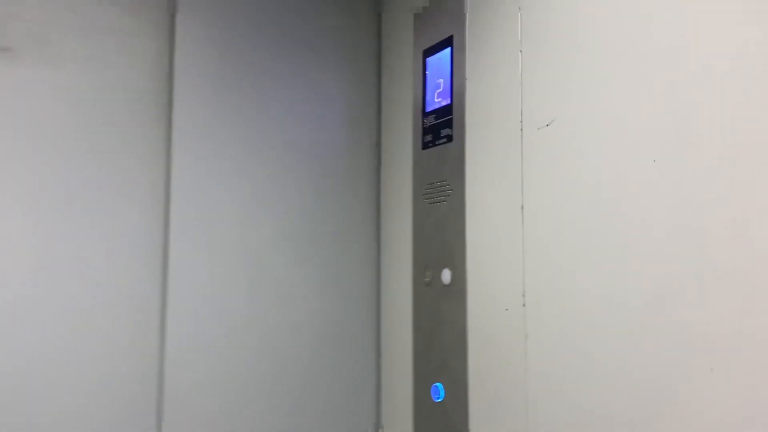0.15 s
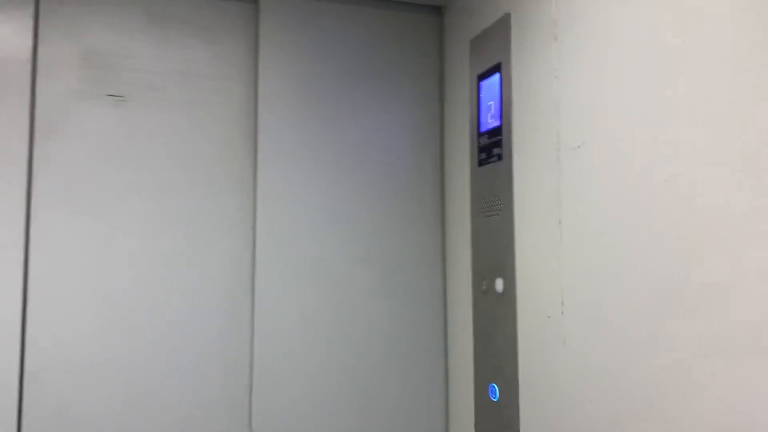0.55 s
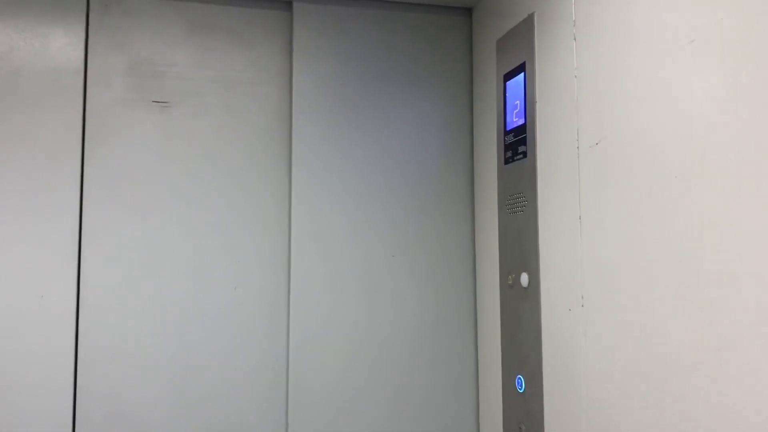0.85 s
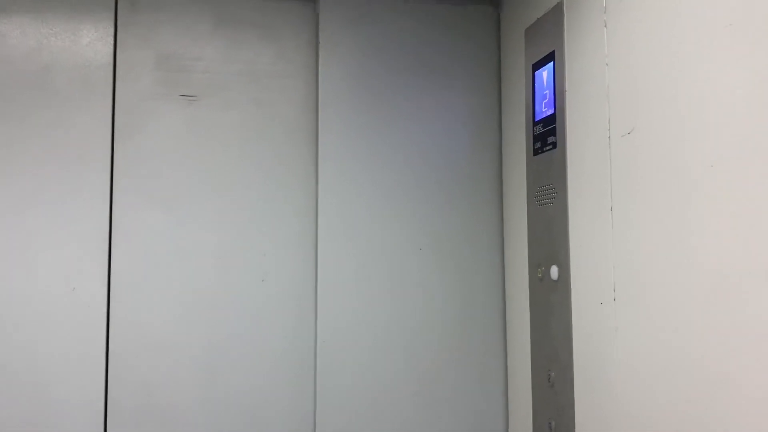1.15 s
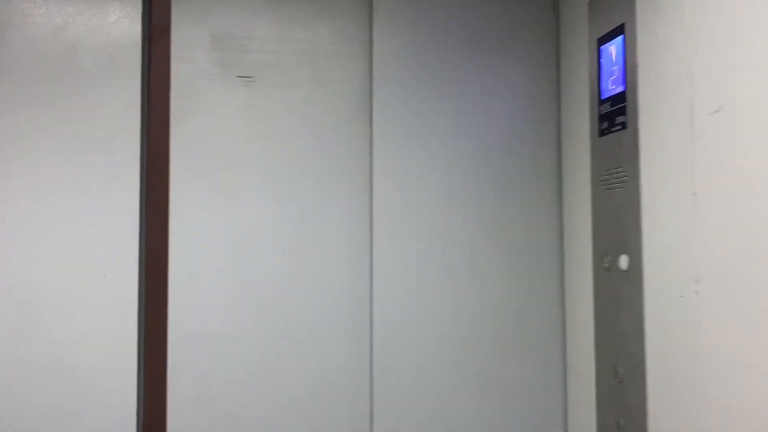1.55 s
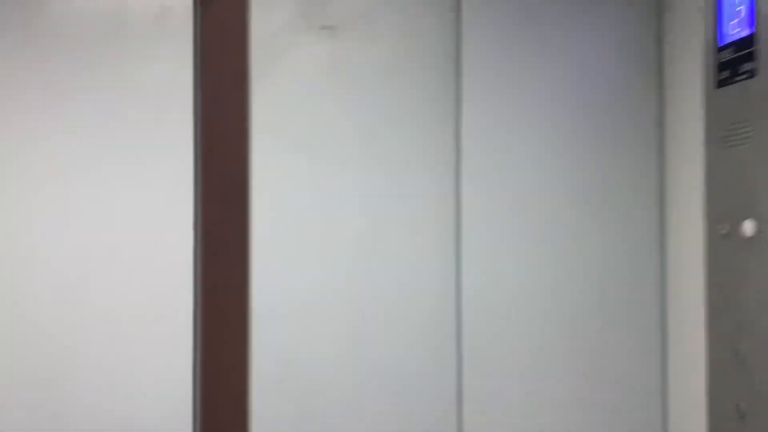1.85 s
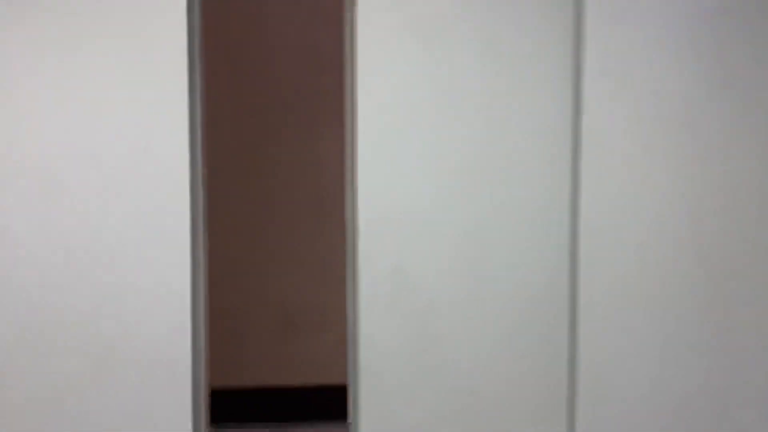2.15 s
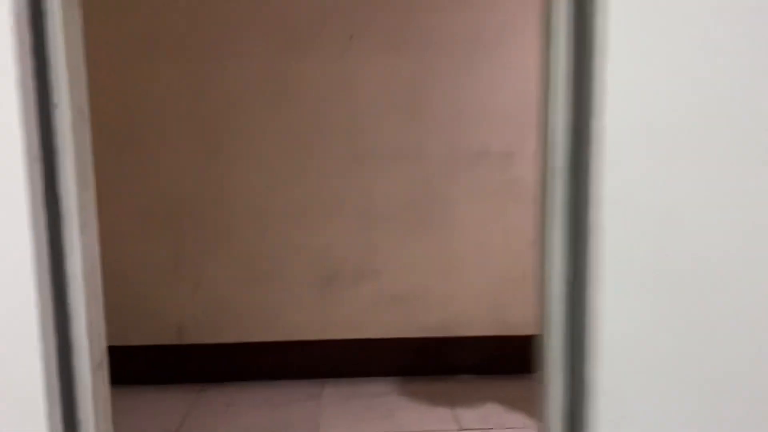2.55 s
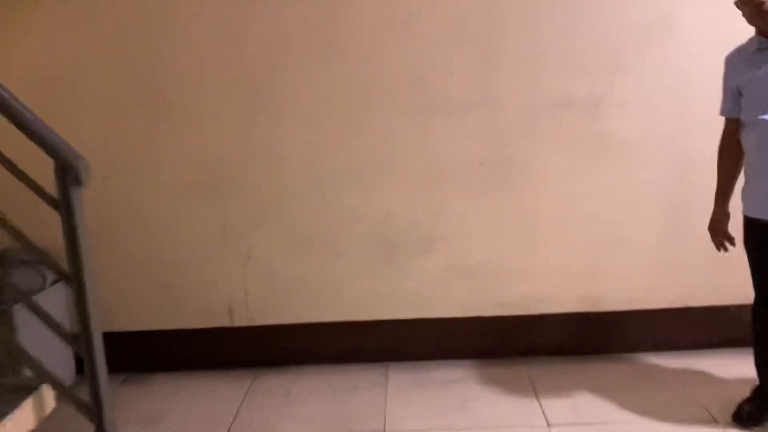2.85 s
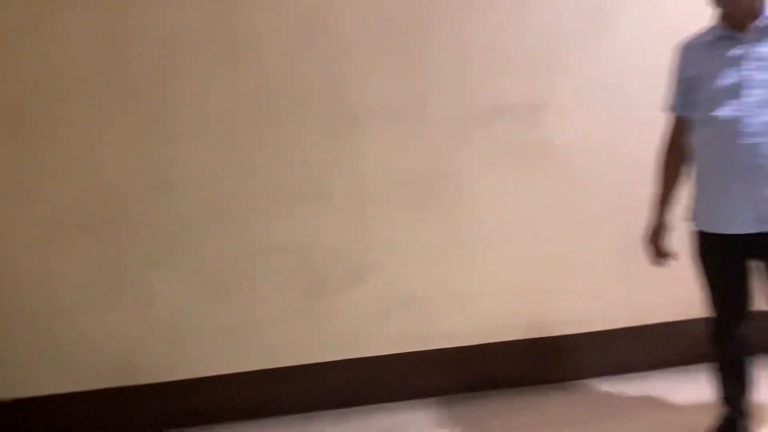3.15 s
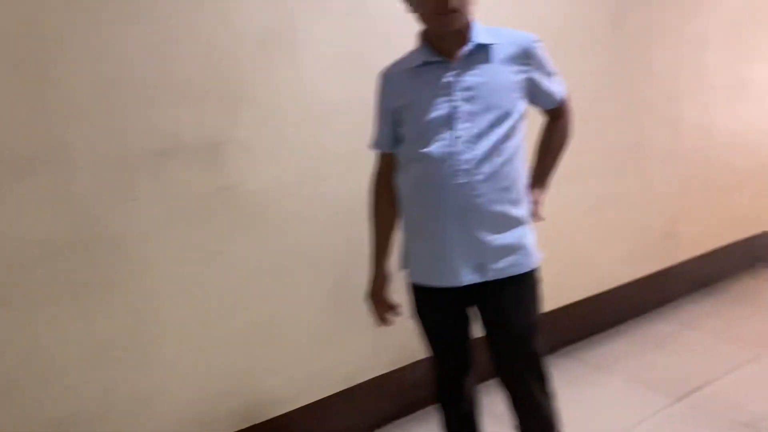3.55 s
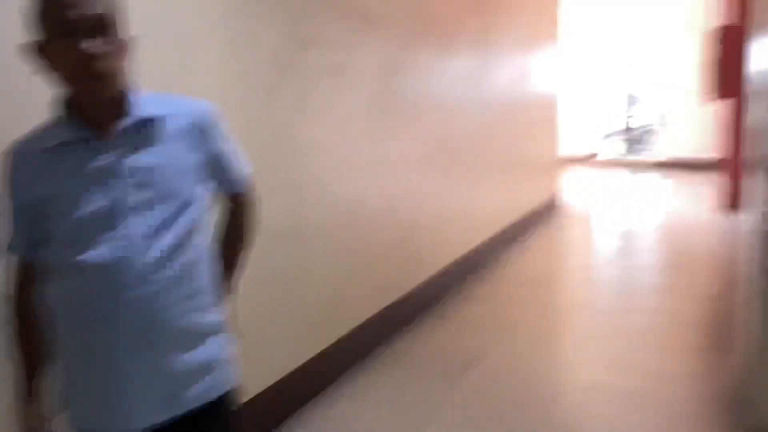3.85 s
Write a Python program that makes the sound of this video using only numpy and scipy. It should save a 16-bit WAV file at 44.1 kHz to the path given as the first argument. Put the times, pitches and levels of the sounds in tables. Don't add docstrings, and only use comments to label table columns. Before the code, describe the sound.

Elevator doors rumble and clunk open after a metallic hiss and short squeak, fan running steadily

```python
import sys
import numpy as np
from scipy import signal
from scipy.fft import rfft, irfft
from scipy.io import wavfile
from scipy.ndimage import uniform_filter1d

SR = 44100
rng = np.random.default_rng(int(sys.argv[2]) if len(sys.argv) > 2 else 0)


def volts_from_db(level):
    exponent = np.asarray(level, float) / 20
    return 10 ** exponent


def log_audio(samples):
    frames = np.atleast_2d(samples).T
    limited = np.clip(frames, -1, 1)
    pcm = np.round(limited * 32767).astype(np.int16)
    wavfile.write(sys.argv[1], SR, pcm)


N = 176400
T = np.arange(N) / SR


def evened(x):
    return x / np.sqrt(np.mean(x ** 2) + 1e-20)


def read(points, hz):
    f, value = np.transpose(points)
    return np.interp(np.log(hz + 1), np.log(f + 1), value)


def slow(rate):
    f = np.geomspace(rate / 20, rate, 16)[:, None]
    t = T[::128]
    waves = np.sin(2 * np.pi * (f * t + rng.random((16, 1)))) / np.sqrt(f)
    return np.interp(T, t, evened(waves.sum(0)))


def noise(spectrum, patchy_db):
    frames, hz = N // 512 + 5, np.fft.rfftfreq(2048, 1 / SR)
    a, b = rng.standard_normal((2, 2, 1025, frames))
    patches = uniform_filter1d(rng.standard_normal((1025, frames)), size=16, axis=0)
    patches = evened(uniform_filter1d(patches, size=7, axis=1))
    z = (a + 1j * b) * volts_from_db(patchy_db * patches + read(spectrum, hz)[:, None])
    return evened(signal.istft(z, nperseg=2048, noverlap=1536)[1][:, :N])


def resonate(x, hz, width):
    turn = np.exp(2j * np.pi * np.cumsum(hz * np.ones(x.shape[1])) / SR)
    r, q = np.exp(-np.pi * np.array([1, 3]) * width / SR)
    smooth = signal.lfilter([1], np.convolve([1, -r], [1, -q]), x / turn)
    return evened((turn * smooth).real)


def rung(drive, modes, pitch):
    return evened(sum(volts_from_db(db) * resonate(drive, hz * pitch, width) for hz, width, db in modes))


def envelope(start, rise, hold, fall_db):
    t = T - start
    return np.clip(t / rise, 0, 1) ** 2 * volts_from_db(fall_db * np.maximum(t - rise - hold, 0))


def placed(sound, start):
    out, at = np.zeros((2, N)), round(start * SR)
    out[:, at:at + sound.shape[1]] = sound[:, :N - at]
    return out


def doors():
    # time in seconds, then levels of rolling, grit and low bass in dB.
    rolling = [(0, -66, -77, -35.5), (1.15, -45, -60, -35), (1.36, -37, -44, -32), (1.6, -42, -43, -33),
               (1.92, -38.5, -41, -31.5), (2.029, -23.5, -38, -29), (2.36, -21, -33, -33.5),
               (2.66, -22, -35, -36.5), (2.82, -19.5, -26, -37), (3.0, -20.5, -26, -29.5),
               (3.2, -20.5, -25, -30.5), (3.34, -21.5, -28, -30), (3.6, -22, -33.5, -34.5),
               (3.82, -28.5, -35, -31), (3.92, -30, -30, -31), (4, -28, -38, -28)]
    # frequency in Hz, level in dB per Hz.
    rumble_colour = [(140, -38), (200, -14), (290, -6.5), (380, -3), (480, -1.5), (680, -3), (900, -10),
                     (1500, -29), (5000, -80)]
    grit_colour = [(600, -38), (950, 1.5), (1300, -3), (1700, -12.5), (3000, -19.5), (4500, -26),
                   (7000, -40.5), (14000, -50)]
    bass_colour = [(15, -31), (30, -14), (58, 1.5), (90, -0.5), (120, -11), (148, -2.5), (180, -12.5),
                   (600, -85)]
    # pitch in Hz, width in Hz, level in dB.
    panels = [(382, 6.4, 5), (425, 13, 0), (464.7, 44, 3), (491, 30, -9.5), (538, 5.9, -6), (609.3, 7.2, 3),
              (683, 19, 1), (735, 9.2, -4), (850, 5.3, 1), (1028, 33, -7), (1262, 13, -7.5)]
    panel_db, lump_db = -5, -0.32

    s, *columns = np.transpose(rolling)
    level, grit, bass = (volts_from_db(np.interp(T, s, db)) for db in columns)
    drive = rng.standard_normal((2, N - SR))
    modes = placed(rung(drive, panels, 1 + 0.012 * slow(6)[SR:]), 1)
    body = (noise(rumble_colour, 0.4) + volts_from_db(panel_db) * modes) * volts_from_db(lump_db * slow(60))
    return level * body + grit * noise(grit_colour, 1.8) + bass * noise(bass_colour, 1.23)


def bumps():
    # start in seconds, peak level in dB, pitch in Hz.
    joints = [(1.983, -10.5, 429), (2.063, -13, 395), (2.189, -9, 449), (2.328, -19, 450), (2.44, -11, 554),
              (2.477, -6.5, 456), (2.532, -8, 461), (2.577, -6, 425), (2.643, -13, 407), (2.722, -16, 471),
              (2.767, -6, 489), (2.805, -13, 563), (2.842, -5, 590), (2.889, -11, 660), (2.974, -12, 424),
              (3.172, -11, 690), (3.384, -12, 575), (3.445, -10.5, 421), (3.565, -11.5, 458),
              (3.622, -18, 433), (3.714, -14, 407)]
    trim_db, rise_s, t60_s = -3, 0.0043, 0.09
    t, out = T[:SR // 5], np.zeros((2, N))
    for (start, db, hz), turns in zip(joints, rng.random((len(joints), 2, 1))):
        shape = np.minimum(t / rise_s, 1) * volts_from_db(db + trim_db - 60 * t / t60_s)
        out += placed(shape * np.sin(2 * np.pi * (hz * t + turns)), start)
    return out


def drones():
    # start in seconds, length in seconds, pitch in Hz, level in dB.
    tones = [(0.271, 0.29, 376, -36.5), (1.3, 0.11, 92.2, -30.5), (2.42, 0.12, 507.4, -23.5),
             (1.448, 0.49, 35.7, -29.5), (1.704, 0.34, 59, -34.5), (1.988, 0.27, 36.6, -32.5),
             (1.997, 0.37, 388, -29), (2.27, 0.18, 458, -19.5), (2.31, 0.1, 661, -24.5),
             (2.497, 0.18, 428.6, -24), (2.528, 0.38, 82.5, -26.5), (2.698, 0.16, 57.6, -31),
             (2.968, 0.19, 382, -22.5), (2.97, 0.096, 672, -24), (3.119, 0.14, 1262, -26),
             (3.15, .2, 138.4, -36), (3.2, 0.24, 423.6, -25), (1.369, 0.25, 386, -36),
             (3.343, 0.38, 75.3, -33.5), (3.873, 0.12, 71.7, -33.5), (.262, .05, 2555, -21.5),
             (0.326, 0.038, 3010, -26), (0.338, .06, 2580, -30), (1.496, 0.33, 331.4, -41),
             (3.902, 0.066, 271.8, -35), (2.112, 0.1, 641, -21.5), (2.819, 0.14, 621, -25.5),
             (3.15, 0.14, 686, -24.5), (3.104, 0.22, 1000, -31), (2.596, 0.22, 700, -28),
             (3.363, .07, 687, -29)]
    wobble_hz = 4.5
    out = np.zeros((2, N))
    for start, length, hz, db in tones:
        t = np.arange(0, length, 1 / SR)
        swell = np.sin(np.pi * t / length) ** 0.27
        wobble = wobble_hz * slow(17.35)[:len(t)] * np.sqrt(hz / 400)
        turns = np.cumsum(hz + wobble) / SR
        level = volts_from_db(db + 2 + 2.76 * slow(39.0)[:len(t)])
        out += placed(level * swell * np.sin(2 * np.pi * (turns + rng.random((2, 1)))), start)
    return out


def brake():
    # pitch in Hz, width in Hz, level in dB.
    steel = [(1680, 220, -11), (2170, 100, -8), (2585, 80, -4), (2777, 190, 1), (3000, 115, 0),
             (3150, 120, -9.5), (3390, 88, -8.5), (3650, 84, -10.5), (4000, 780, -8.5)]
    # frequency in Hz, level in dB per Hz.
    air_colour = [(200, -12.5), (380, 1), (750, -6.5), (1200, -1), (1900, -9.5), (2800, -13), (5500, -18),
                  (8000, -33.5), (13000, -43)]
    start_s, upswell_s = 0.25, 0.049

    drive = rng.standard_normal((2, SR)) * volts_from_db(0.98 * slow(79.2)[:SR])
    ring = placed(rung(drive, steel, 1 + 0.012 * slow(25)[:SR]), 0)
    upswell = volts_from_db(-37.5) * envelope(start_s - upswell_s, 0.033, upswell_s, -300)
    release = volts_from_db(-19.5) * envelope(start_s, rise=0.017, hold=0.085, fall_db=-86)
    hiss = noise(air_colour, 3.1) * envelope(start_s, rise=0.059, hold=0.078, fall_db=-54.5)
    return ring * (release + upswell) + volts_from_db(-24.5) * hiss


def squeak():
    # multiple of the pitch, level in dB, width in Hz.
    partials = [(.93, -8, 110), (1, 1.5, 53), (1.15, -13, 140), (2.04, -7, 160), (2.57, -20, 120),
                (3.1, -18, 250), (3.45, -17, 410), (4.68, -17, 230), (5.14, -23, 300)]
    start_s, pitch_hz, glide_hz = 1.328, 2097, 100
    late_s, late_hz = 1.38, 2520

    t = T[:SR // 2]
    hz = pitch_hz + glide_hz * np.clip(t / 0.045, 0, 1)
    drive = rng.standard_normal((2, len(t))) * volts_from_db(5.2 * slow(56)[:len(t)])
    tone = evened(sum(volts_from_db(db) * resonate(drive, k * hz, width) for k, db, width in partials))
    tone = placed(tone, start_s) * envelope(start_s, rise=0.012, hold=0.073, fall_db=-110)
    rasp = noise([(900, -1), (2000, -1.5), (7500, 3), (11500, 1.0), (14000, -43)], 1.7)
    rasp = rasp * envelope(start_s, rise=0.042, hold=0.07, fall_db=-100)
    late = placed(resonate(drive, late_hz, 220), late_s - 0.01) * envelope(late_s, 0.01, 0.047, -100)
    return volts_from_db(-38.5) * late + volts_from_db(-32.5) * tone + volts_from_db(-38.5) * rasp


def ticks():
    # start in seconds, level in dB, centre in Hz, rise in seconds, 60 dB decay in seconds.
    scuffs = [(1.291, -29.5, 207, 0.062, 1), (1.36, -38, 10500, .004, .2), (1.9, -45.5, 7800, .004, 0.57),
              (2.101, -44, 11000, 0.018, 0.71), (2.43, -42, 15000, .002, 0.1),
              (2.817, -30.5, 3200, 0.001, 0.09), (2.817, -46, 8000, .001, .15),
              (.265, -47, 13500, 0.0043, 0.41), (2.84, -37, 3000, .002, 0.17),
              (2.949, -36.5, 7500, 0.0023, 0.088), (2.951, -41, 13500, .002, .12),
              (2.98, -45, 4000, .003, 0.16), (3.15, -36.5, 3500, .015, 0.32),
              (3.33, -42.5, 10000, 0.014, 0.43), (3.677, -43, 12000, .0015, 0.12),
              (3.881, -40.5, 3000, 0.018, .4)]
    spread_octaves = 0.9
    hz, t, out = np.fft.rfftfreq(SR // 2, 1 / SR), T[:SR // 2], np.zeros((2, N))
    for start, db, centre_hz, rise, t60 in scuffs:
        octaves = np.log2((hz + 1) / centre_hz)
        colour = np.exp(-0.5 * (octaves / spread_octaves) ** 2) / (1 + (hz / 15000) ** 6)
        burst = evened(irfft(rfft(rng.standard_normal((2, len(t)))) * colour))
        out += placed(volts_from_db(db - 60 * t / t60) * np.minimum(t / rise, 1) * burst, start)
    return out


def fan():
    # frequency in Hz, level in dB per Hz.
    hiss_colour = [(170, -35), (210, -1.5), (400, -0.5), (800, -3.5), (1300, -8), (2500, -12.5),
                   (5000, -22.5), (15000, -39)]
    top_colour = [(5000, -20), (6600, 2), (8500, -1.5), (10500, -6), (12500, -10.5), (14000, -14),
                  (15500, -19), (16000, -60)]
    hiss = volts_from_db(-39) * noise(hiss_colour, 0.69)
    top = volts_from_db(-51 + 1.3 * slow(29.5) + 0.61 * slow(4.59)) * noise(top_colour, 0.39)
    return volts_from_db(0.27 * slow(3.25)) * (hiss + top)


def scene():
    return doors() + bumps() + drones() + brake() + squeak() + ticks() + fan()


def ports(field):
    # frequency in Hz, likeness (clipped to 0 to 1 after reading).
    likeness = [(60, 0.54), (130, 0.6), (290, 0.76), (640, 0.64), (1400, -0.44), (3100, 0.27), (6200, 1.3),
                (6900, 2)]
    # frequency in Hz, lead of the left in radians.
    lead = [(0, 0), (1100, -1.3), (3000, -5.8), (6000, -4.6), (7200, -6.3), (9000, -9.42), (16000, -20.2)]
    # frequency in Hz, left minus right in dB.
    balance = [(60, 0.23), (130, 6.1), (290, 10.6), (640, 3.4), (1400, 4), (3100, 2.8), (6200, 6.9),
               (6900, 0.24)]
    hz, (a, b) = np.fft.rfftfreq(N, 1 / SR), rfft(field)
    same, tilt = np.clip(read(likeness, hz), 0, 1), volts_from_db(read(balance, hz) / 2)
    delay = np.exp(-1j * np.interp(hz, *np.transpose(lead)))
    left = a * tilt
    right = (same * delay * a + np.sqrt(1 - same ** 2) * b) / tilt
    return irfft(np.array([left + right, left - right]) / 2, N)


def gated(x):
    # frequency in Hz, threshold in dB.
    threshold = [(6600, -130), (6900, -90), (7600, -89), (8500, -80.5), (11000, -85.5), (13000, -89),
                 (14500, -92), (15700, -93.5)]
    edge_hz, mask_db = 15750, -54
    hz, _, z = signal.stft(x, SR, nperseg=2048, noverlap=1024)
    power = uniform_filter1d(abs(z) ** 2, size=10, axis=1)
    masker = power[:, (hz > 2000) & (hz < 4000)].mean((0, 1))
    gate = volts_from_db(2 * read(threshold, hz))[:, None] * np.sqrt(1 + masker / volts_from_db(mask_db) ** 2)
    shut = (power < gate) | (hz > edge_hz)[:, None]
    return signal.istft(z * ~shut, SR, nperseg=2048, noverlap=1024)[1][:, :N]


def low_pass(x):
    return signal.sosfilt(signal.butter(12, 16480, fs=SR, output="sos"), x)


def record(dry):
    mid, side = gated(ports(dry))
    return low_pass(np.array([mid + side, mid - side]))


dry = scene()
out = record(dry)
log_audio(out)
```